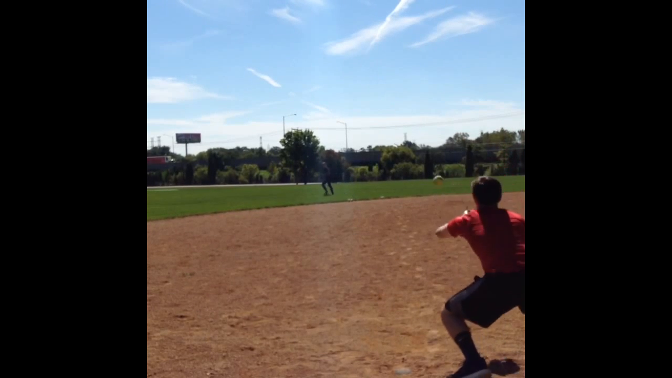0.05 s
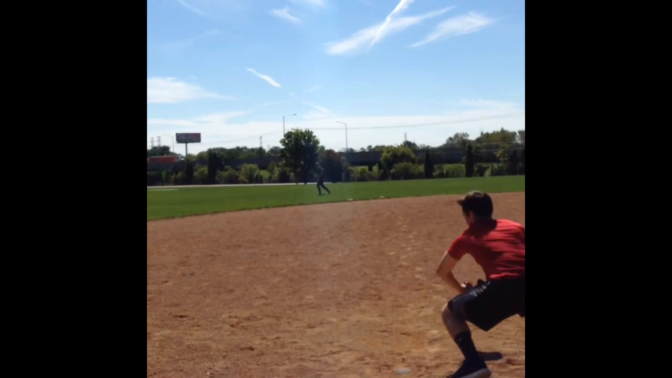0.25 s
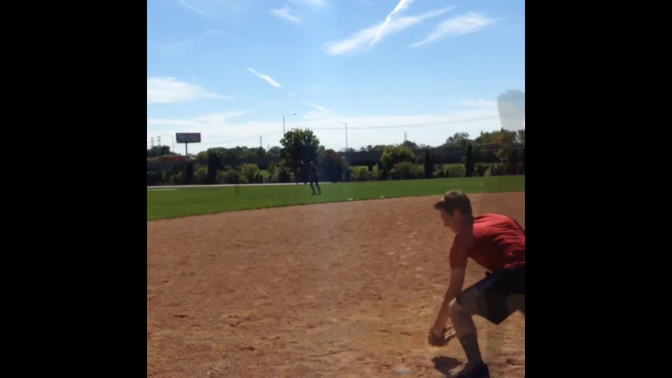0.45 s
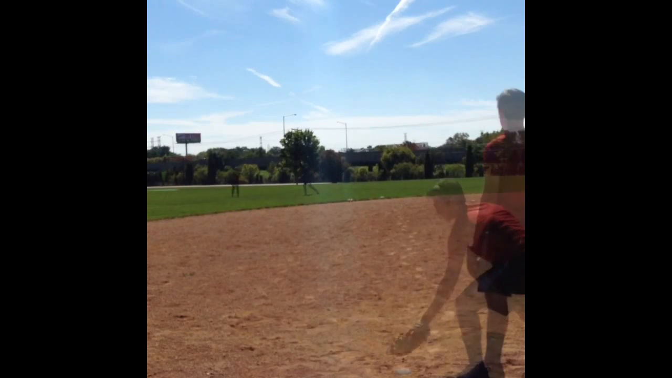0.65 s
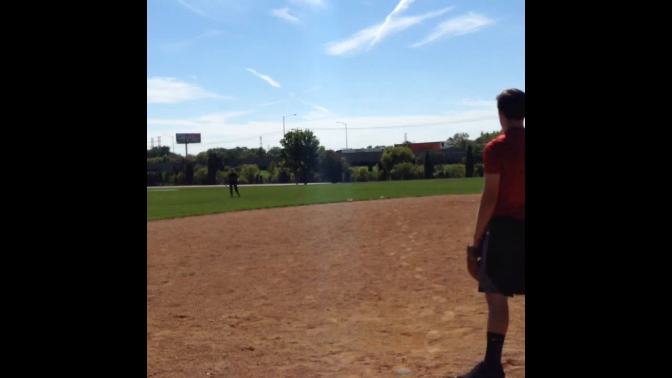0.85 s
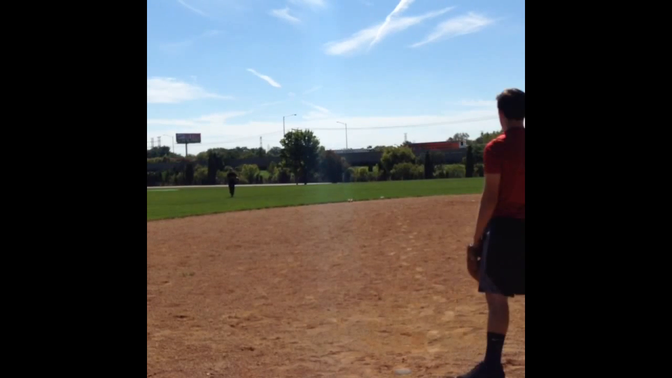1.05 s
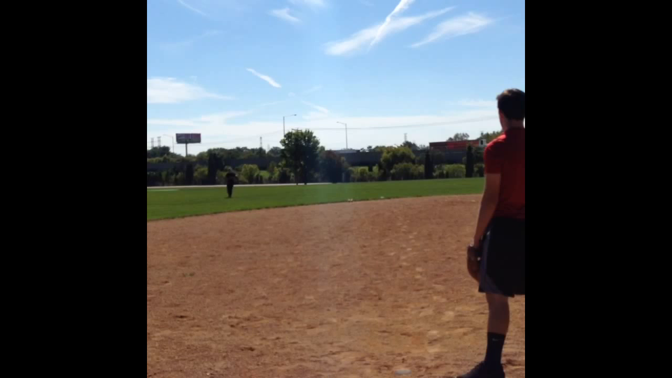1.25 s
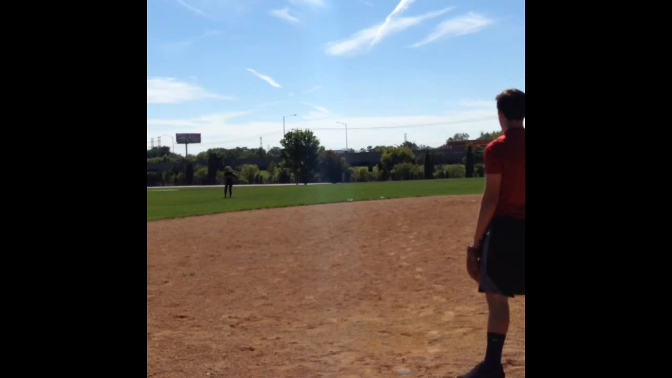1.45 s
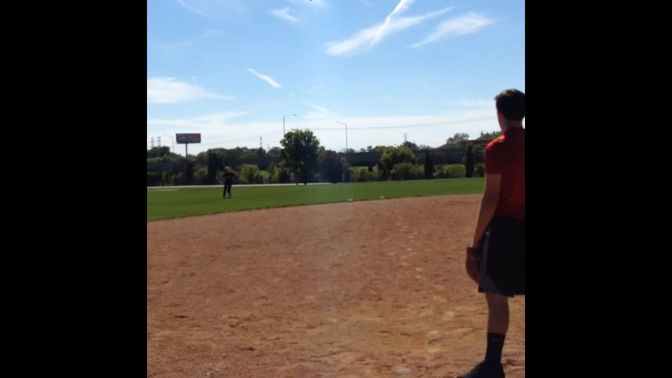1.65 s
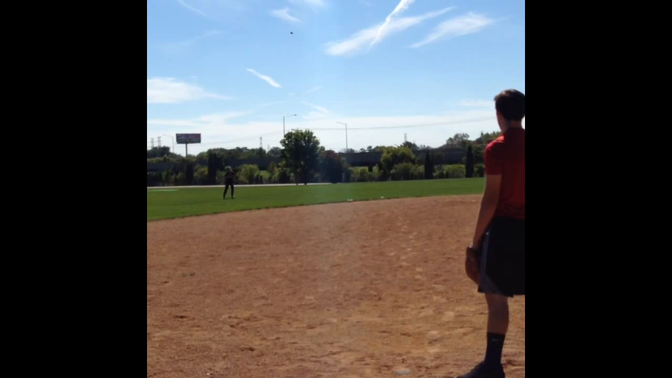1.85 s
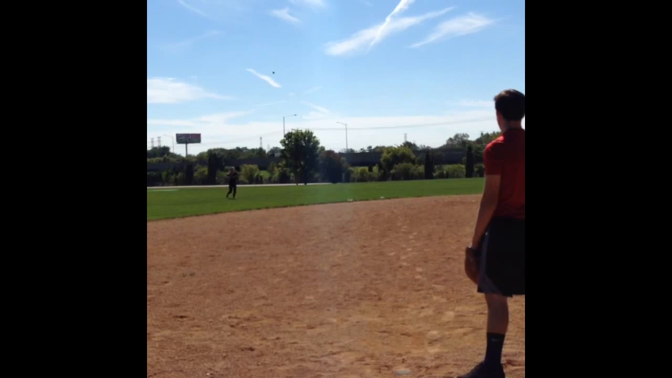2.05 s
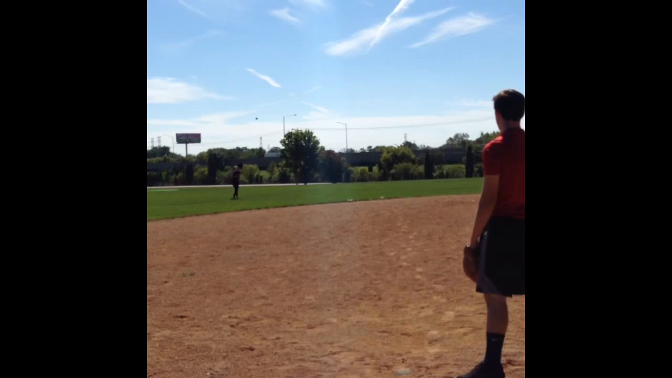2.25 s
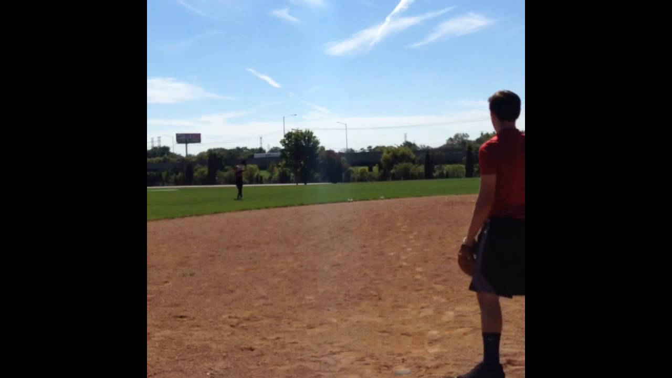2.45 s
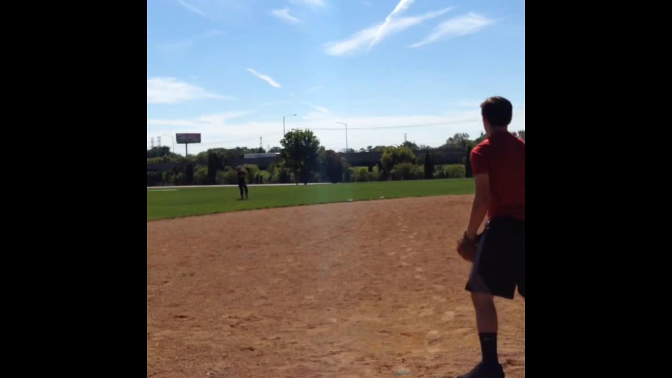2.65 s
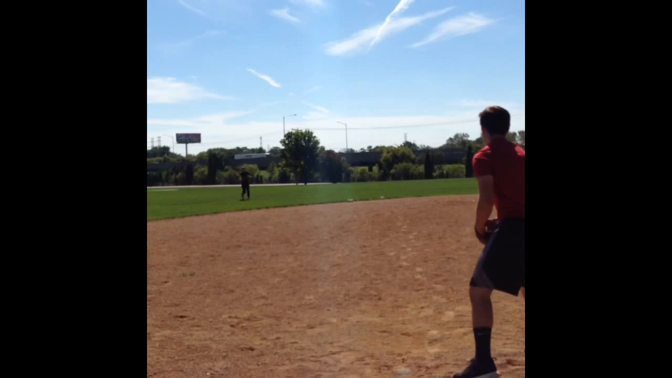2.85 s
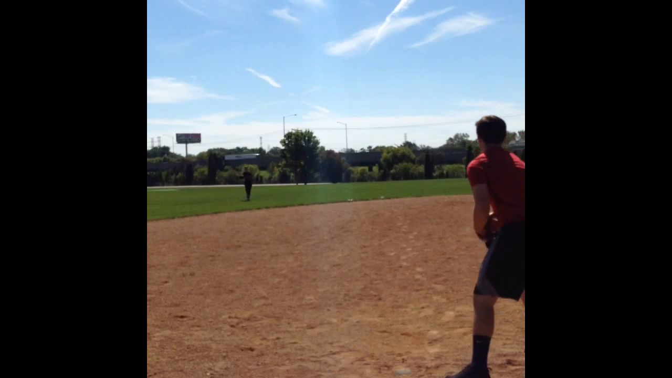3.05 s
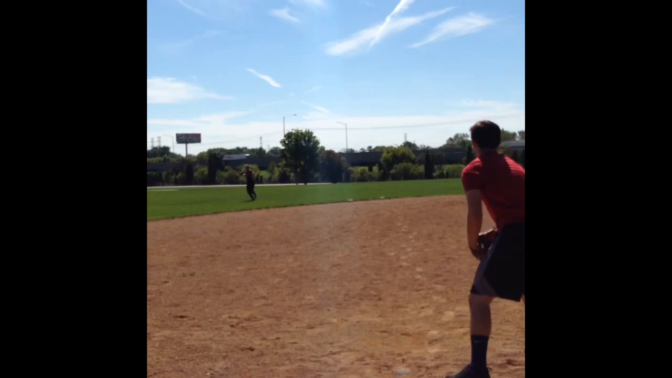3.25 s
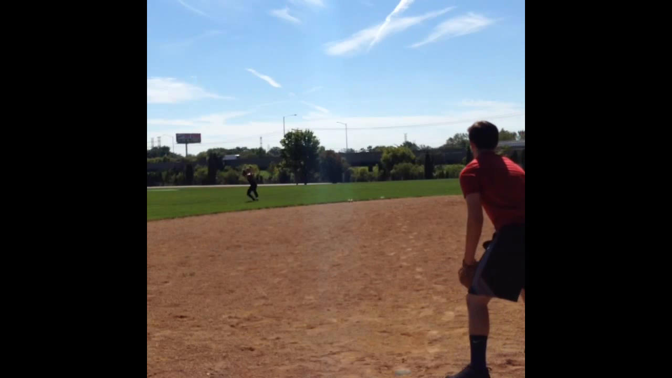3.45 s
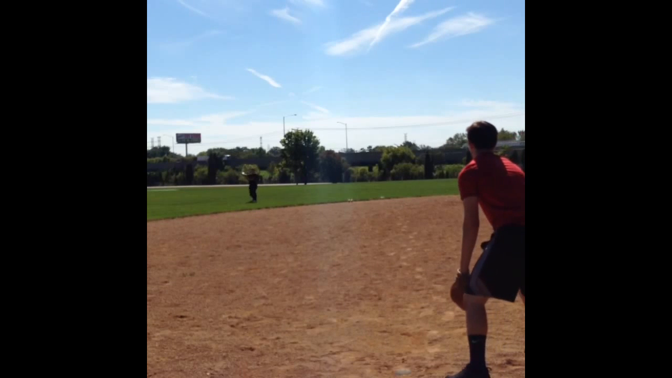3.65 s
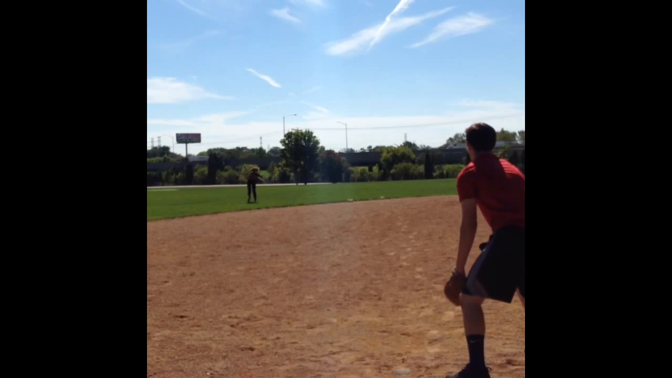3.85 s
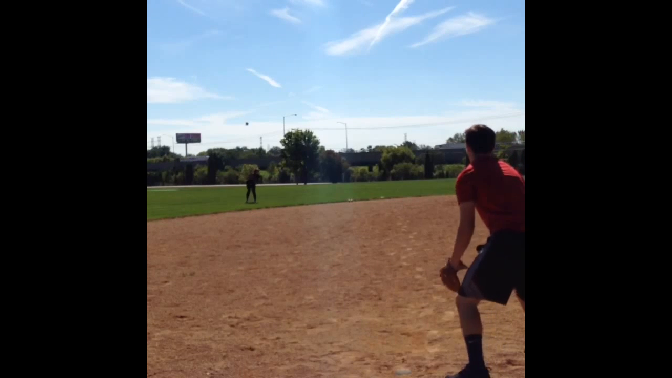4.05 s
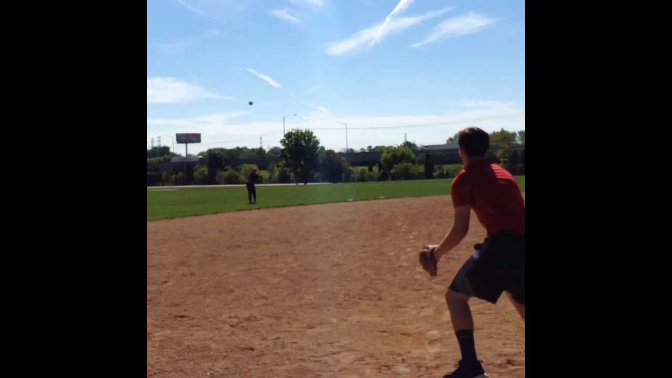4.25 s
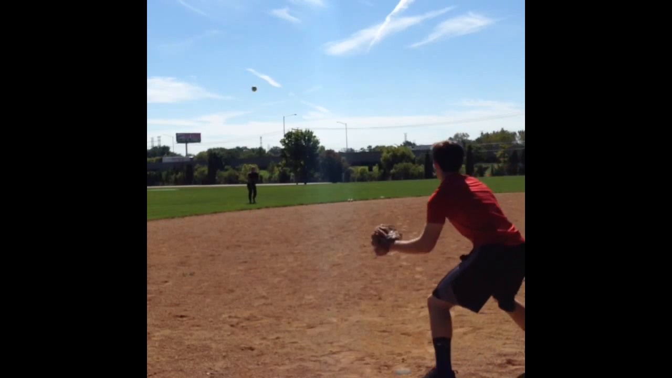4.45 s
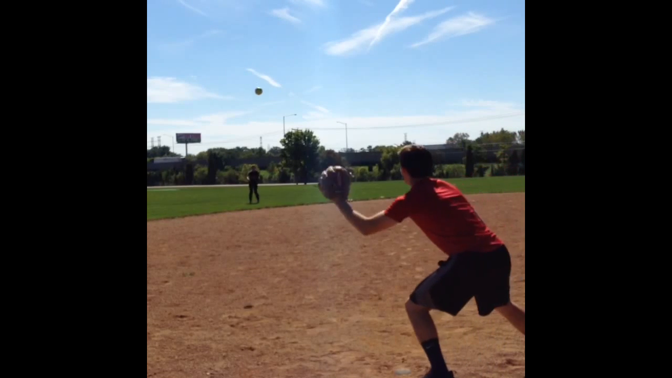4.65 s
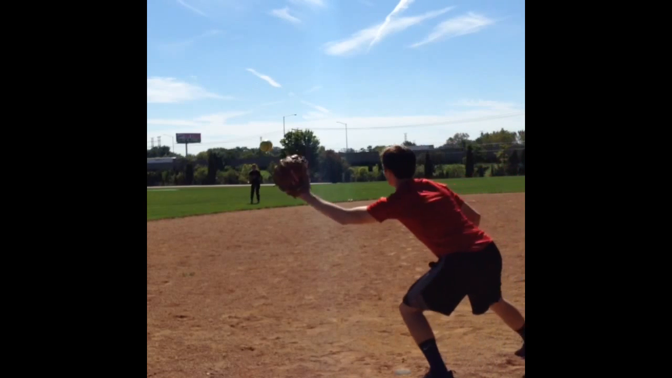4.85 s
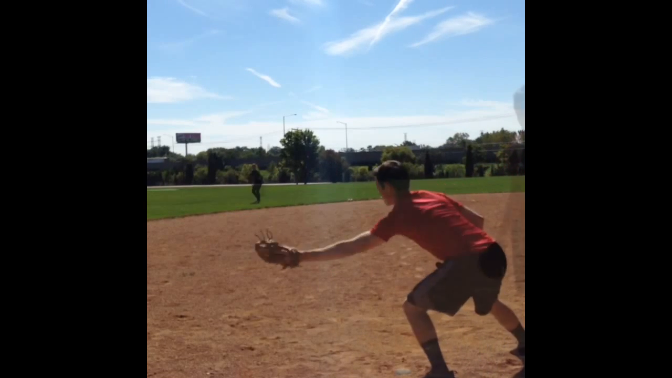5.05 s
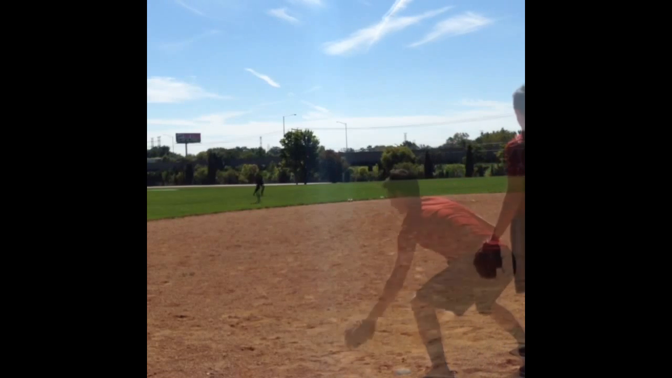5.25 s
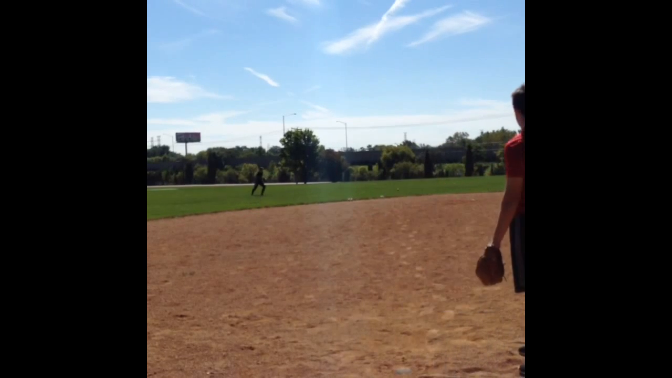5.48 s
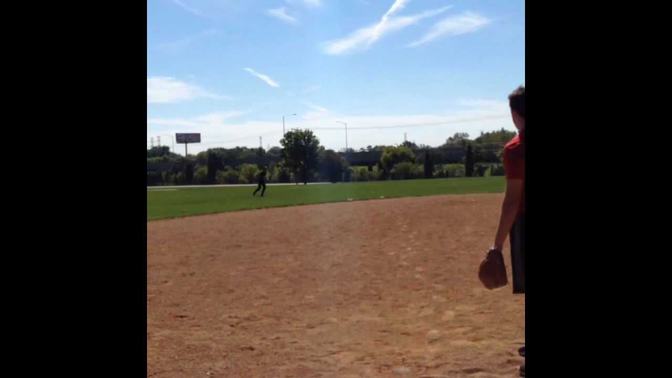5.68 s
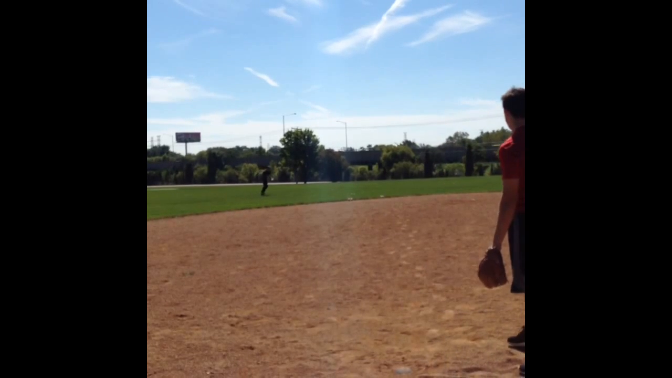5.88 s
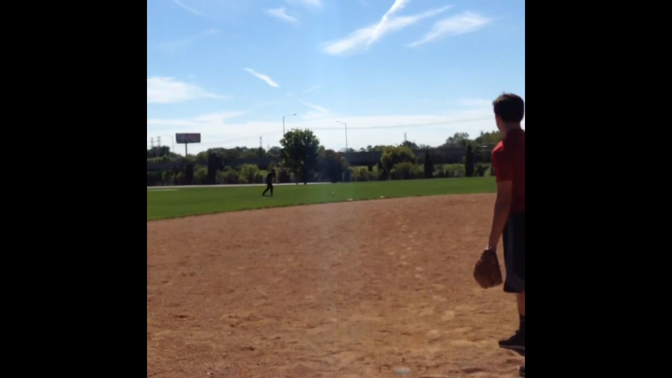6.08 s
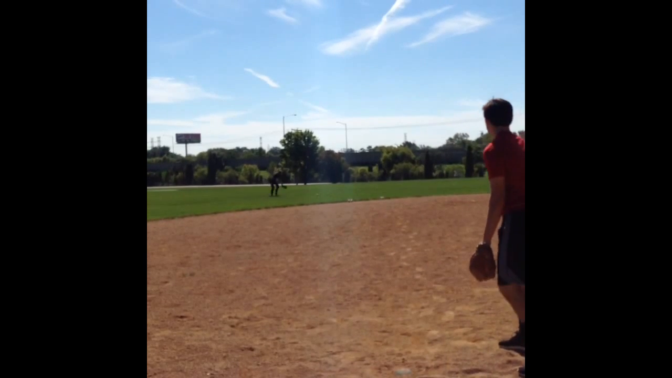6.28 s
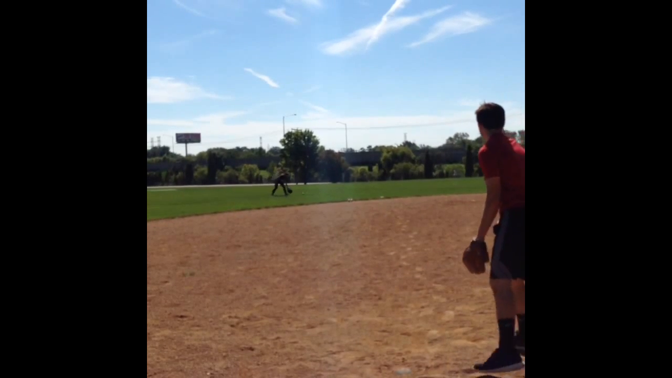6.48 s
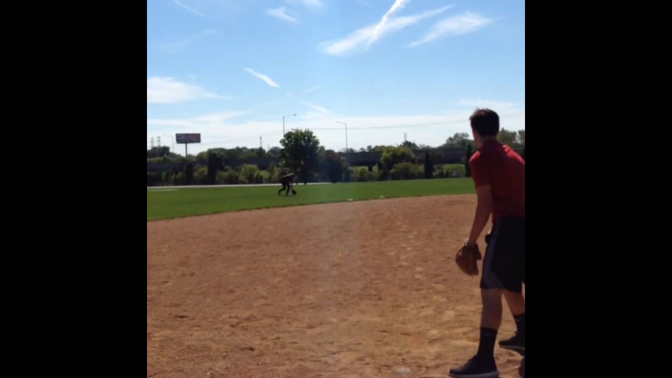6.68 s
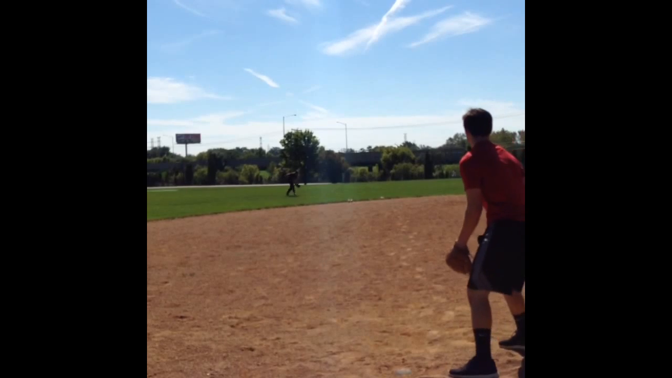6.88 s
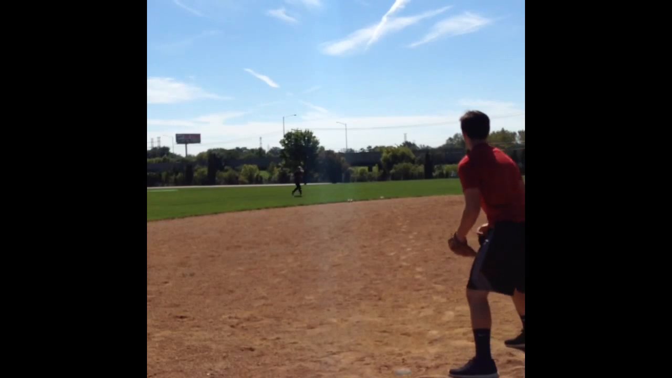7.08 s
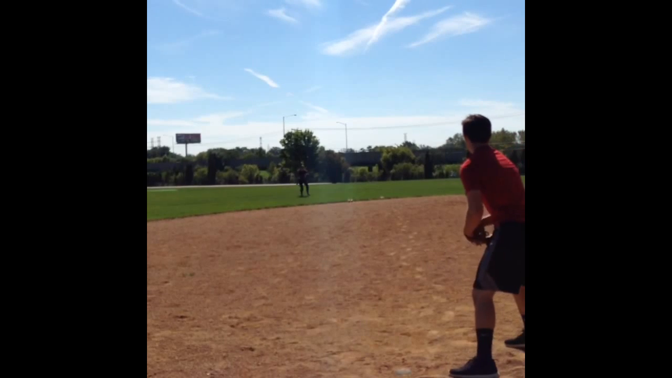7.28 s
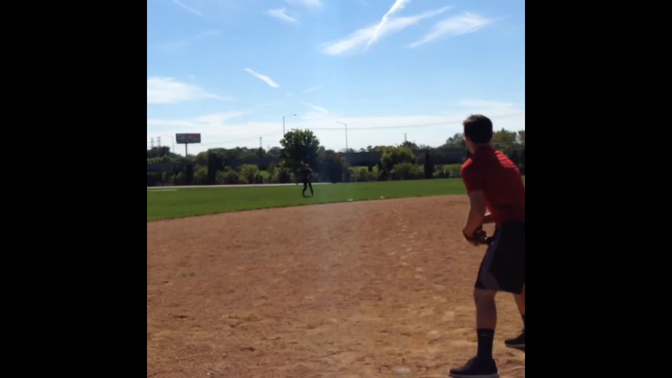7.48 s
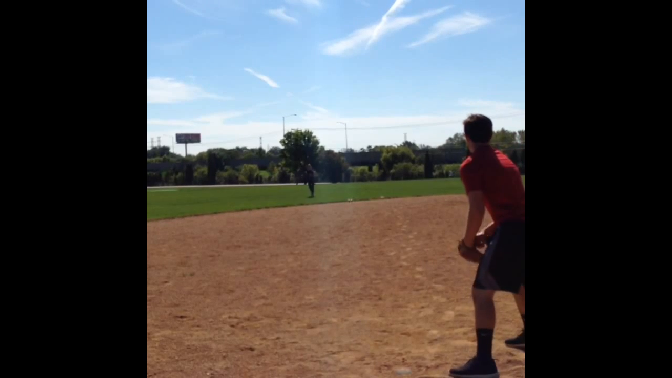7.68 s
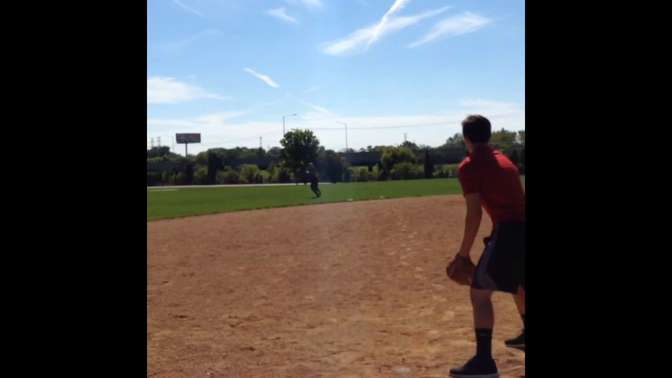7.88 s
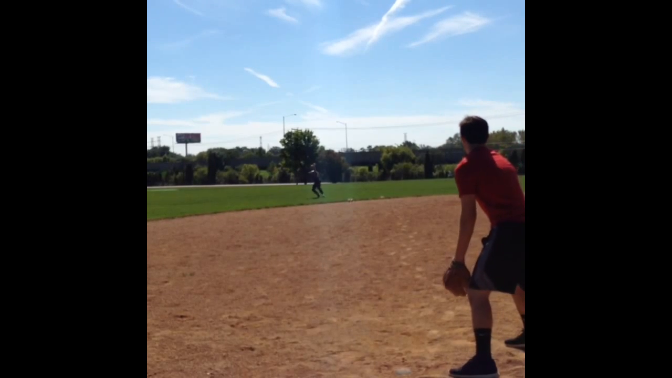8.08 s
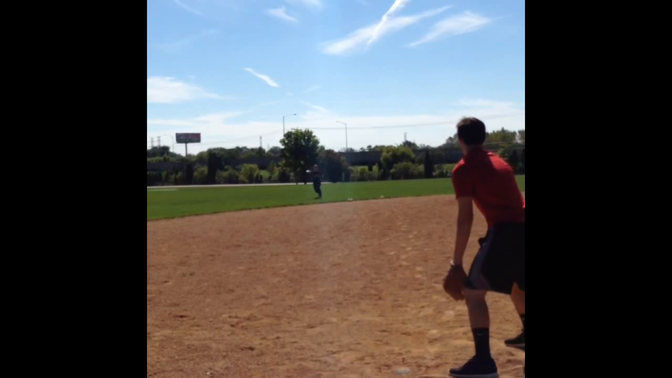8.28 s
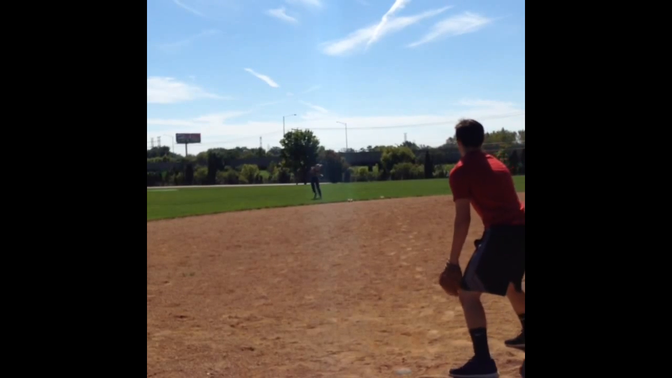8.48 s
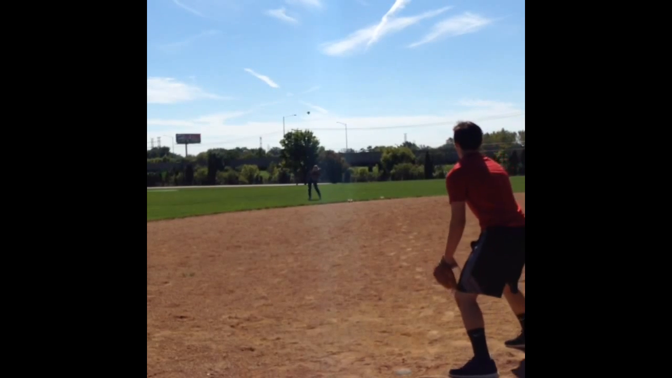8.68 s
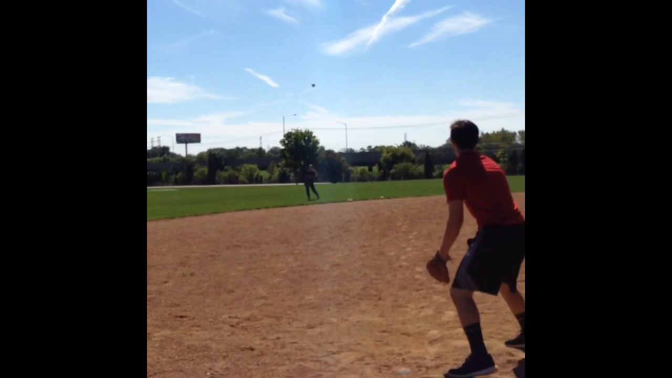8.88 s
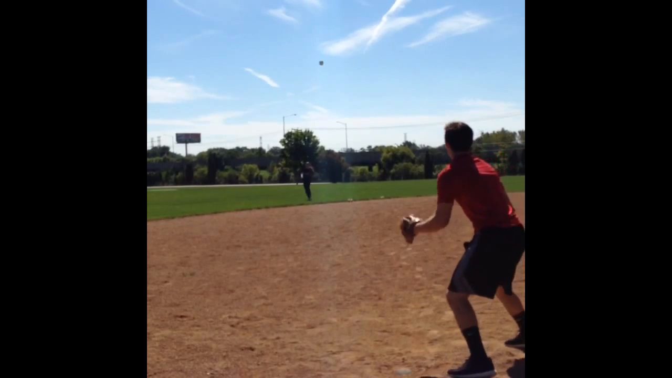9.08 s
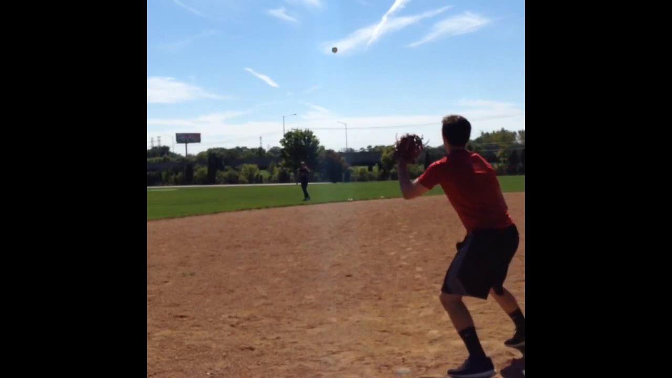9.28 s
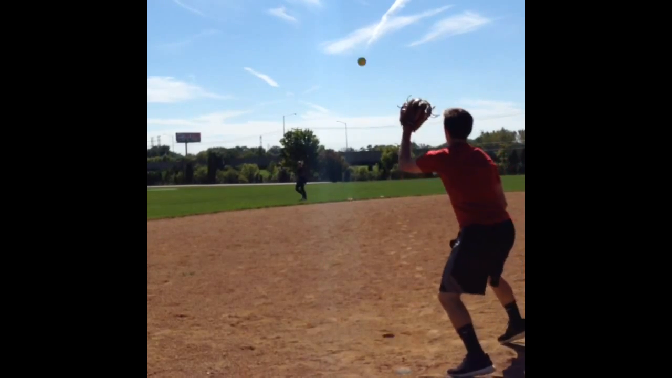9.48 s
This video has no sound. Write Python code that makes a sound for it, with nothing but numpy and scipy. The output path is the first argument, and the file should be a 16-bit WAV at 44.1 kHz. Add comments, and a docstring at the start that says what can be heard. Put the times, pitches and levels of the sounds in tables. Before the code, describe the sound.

Steady highway rumble and faint insect hiss lie behind a game of catch outdoors. Two short leather glove pops sound near the microphone while a passing truck hums and its metal clatter builds. After a light gritty scuff, a third catch cracks loudest and the rattling stops. The rest is quieter: soft footfalls, a fast, thin bird trill and another bird buzzing very faintly far away.

```python
"""A ball pops into a leather glove close by and feet scuff the grit: long toss on an open dirt field.
Pops and faint leather or lace ticks ring the glove's modes, scrunch and echo off the ground.
A truck drones past, bumps rattling its loose metal; behind it a highway rumbles and roars in noise bands.
A small bird trills in fast, high sine sweeps, another buzzes faintly far away, insects hiss in grass."""
import sys
import numpy as np
from scipy import signal
from scipy.io import wavfile

SR = 44100
rng = np.random.default_rng(int(sys.argv[2]) if len(sys.argv) > 2 else 0)


def to_wav(sig):
    """Store sig (one row per channel, or 1-D mono) as 16-bit WAV at the path in sys.argv[1].

    Samples outside -1..1 are clipped; the rate is SR.
    """
    pcm = np.clip(np.atleast_2d(sig), -1, 1) * 32767
    pcm = np.round(pcm).astype(np.int16)
    wavfile.write(sys.argv[1], SR, pcm.T)  # frames by channels


N = 420273

# Ball pops, and faint leather or lace ticks just after.
# Each row: start in seconds, level in dB, tilt in dB per octave, palm slap in dB, pitch ratio,
# scrunch level in dB, scrunch length in seconds, scrunch fade in dB.
GLOVE_SOUNDS = [(.1866, -19, -.5, -5, .85, -29, .0125, -9), (2.6403, -11.5, -5, -6, .9, -41, .005, -10),
                (.2385, -44, 0, 0, 1, -54, .004, -6), (5.04690, -1, 0, -1, 1, -31.5, .055, -21),
                (5.0568, -42, 5, 0, 1, -52, .004, -6)]
# Each row: frequency in Hz, relative level in dB, T60 in seconds.
GLOVE_MODES = [(380, -29, .012), (560, -11, .008), (760, -13, .004), (1050, -13, .005), (1400, -22, .006),
               (2100, -29, .003), (3150, -3, .002), (3750, -9, .002), (5100, -11.5, .0018),
               (7400, -11, .0015), (8600, -14, .0013), (10500, -19, .0012), (12800, -22, .001)]
# Each row: frequency in Hz, relative density in dB.
LEATHER_SPECTRUM = [(180, -29), (330, -3), (700, -6.5), (1900, -4), (2900, -15), (3700, -11), (5200, -19),
                    (7110, -17), (15400, -33)]
POCKET_TOP_HZ, SLAP_BAND_HZ, GLOVE_LOW_HZ = 1800, (2000, 4500), 280
GROUND_ECHO_S, GROUND_ECHO_DB, GROUND_CUT_HZ = .00194, -6, 6000
# Low thuds of the ball in the glove and of footsteps.
# Each row: start in seconds, peak in dB, frequency in Hz, T60 in seconds.
THUDS = [(.189, -32, 355, .045), (9.0, -37, 250, .04), (5.86, -27, 82, .07), (5.862, -30, 225, .04),
         (6.6, -35, 223, .04), (1.6, -34, 202, .06)]

# Each row: peak time in seconds, level in dB.
SHOE_DRAGS = [(4.39, -72), (4.49, -68), (4.515, -65), (4.565, -62), (4.6, -67), (4.64, -70), (5.03, -66)]
# Each row: start in seconds, peak in dB, frequency in Hz.
PEBBLE_TICKS = [(0.8834, -67, 8100), (3.0294, -62, 12500), (4.556, -41, 13200), (4.5604, -35, 9530),
                (4.5714, -46, 10500), (4.5784, -43, 11000), (4.6244, -50, 12000), (4.6428, -45, 11500)]

# Truck hitting bumps. Each row: peak time in seconds, rattle level in dB, high-mode boost in dB.
JOLTS = [(.52, -59.5, 0), (.8, -60, 0), (1.08, -53, 3), (1.32, -52, 2), (1.94, -58, 0), (2.16, -57.5, 0),
         (2.55, -55, 0), (2.89, -50, 2), (3.12, -52, -2), (3.25, -50, 0), (3.31, -48, 0), (3.64, -60, 0),
         (3.8, -58, 0), (3.92, -57, 0), (4.155, -45.5, 2.5), (4.26, -47.5, 1), (4.4, -46.5, 1),
         (4.57, -47, 1), (4.76, -46.5, 0), (5.0, -47, 0)]
# Loudest metal knocks. Each row: start in seconds, strength in dB.
CLANKS = [(1.103, -44), (1.38, -45), (2.88, -45), (3.11, -45), (3.255, -44), (3.29, -42), (3.325, -43),
          (4.0906, -33), (4.1295, -34), (4.145, -36), (4.17, -36), (4.19, -37), (4.212, -37), (4.2547, -34),
          (4.331, -38), (4.3745, -35), (4.4139, -36), (4.5341, -39), (4.576, -33), (4.606, -38),
          (4.62, -38), (4.698, -37), (4.74, -37), (4.7535, -34), (4.768, -32), (4.9337, -37), (4.9853, -33)]
# Each row: frequency in Hz, relative level in dB, T60 in seconds.
METAL_MODES = [(2600, -4.5, 0.0095), (3430, -4, 0.016), (3720, -5, 0.016), (4300, -4.5, 0.0078),
               (4910, -5.5, 0.0067), (5630, -9, 0.007), (6670, -6.5, 0.0026), (8100, -7.5, .003)]
MODE_SPLIT_RATIOS, HIGH_MODES_HZ = (.98, 1.03), 4000
RATTLE_IDLE_DB, RATTLE_END_S, RATTLE_BAND_HZ = -63.5, 5.09, (2200, 7370)
CLICKS_PER_S, KNOCKS_PER_S, KNOCK_OVER_RATTLE_DB = 5000, 10, -1
# Each row: start in seconds, length in seconds, pitch in Hz, rms level in dB.
ENGINE_TONES = [(0, .63, 122, -44.5), (2.0, .9, 121, -43), (2.85, 1.1, 122, -41), (3.95, .35, 122, -43),
                (5.3, .35, 120, -42), (6.0, 0.97, 119, -44.5), (8.5, 1.23, 120, -42), (1, 4.3, 74.5, -44.5),
                (3.9, 1.25, 178, -44), (3.9, 1.25, 197, -45), (3.9, 1.45, 223, -50),
                (2.75, .65, 313, -45.5), (2.75, .45, 288, -48), (3.6, .8, 311, -47.5),
                (4.2, .65, 463, -46.5), (3.7, 1.5, 467, -53), (1.4, 2, 468, -57), (6.2, .9, 390, -56),
                (2.7, .8, 150, -45), (5.1, .65, 463, -55), (0, 1.2, 495, -56), (0.6, .8, 320, -53)]

# Each row: time in seconds, rumble in dB, engine band in dB, tyre roar in dB.
HIGHWAY_LEVELS = [(0.0, -35, -40.5, -45), (0.7, -41, -43.5, -47.5), (1.2, -37, -40.5, -44),
                  (1.7, -40.5, -41, -46.5), (2.5, -38, -42.5, -42.5), (2.95, -39, -33, -44),
                  (3.35, -40.5, -40.5, -44), (3.6, -38, -43, -41), (3.9, -40, -38.5, -45),
                  (4.5, -37.5, -41, -42.5), (5.0, -38.5, -37.5, -45), (5.2, -39.5, -45, -50.5),
                  (5.7, -41.5, -43, -46), (6.2, -37, -43, -46), (7.1, -37.5, -43.5, -44.5),
                  (7.5, -39.5, -45.5, -47), (8.3, -38, -45, -45.5), (9.0, -38.5, -43.5, -46.5),
                  (9.53, -35.5, -43.5, -47)]
# Highway treble. Each row: time in seconds, level in dB.
HIGHWAY_HISS = [(0, -62.5), (2.6, -62), (4.5, -60.5), (5.1, -61), (5.3, -64.5), (6.2, -62.5), (7.1, -66),
                (9.53, -65.5)]
# Each row: frequency in Hz, relative density in dB.
TRAFFIC_SPECTRUM = [(12, -42), (20, -30.5), (60, -1), (113, -1.5), (173, -5.5), (285, -14), (636, -16.5),
                    (1080, -16.5), (1780, -20.5), (3160, -36.5), (5220, -41), (7060, -54), (8000, -42),
                    (10400, -79), (17600, -120)]
ROAR_HZ, ROAR_HZ_PER_DB, ROAR_REF_DB = 1114, 28, -44.5  # nearer tyres roar louder and higher
HUMP_WIDTH_HZ, HUMP_DB = 476, -3.5

# One trill note. Each row: time in seconds, pitch in Hz, relative level in dB.
NOTE_SHAPE = [(0, 8440, -12), (.004, 8900, 3), (.008, 8690, -1), (.013, 8200, -1.5), (0.018, 7400, -25)]
# One list per trill, notes evenly spaced between rows. Each row: time in seconds, level in dB.
TRILLS = [
    [(0.4723, -77), (0.7876, -74)],
    [(5.1372, -70), (5.3622, -62.5), (5.5293, -58.5), (6.3076, -59), (8.1624, -58), (8.9935, -59),
     (9.4789, -59)],
]
# One pitch ratio per trill.
TRILL_PITCH_RATIOS = [.955, 1]
NOTE_PERIOD_S = .0547
# Far bird's held buzzes. Each row: start in seconds, length in seconds, level in dB.
BUZZES = [(5.5, .35, -75), (5.88, .64, -77), (6.8, .6, -82), (7.7, .47, -77), (8.52, .48, -76),
          (9.17, .5, -78)]
# Each row: frequency in Hz, relative level in dB.
BUZZ_PARTIALS = [(5810, -6), (5280, -5), (5130, 0)]
# Far bird's falling phrases. Each row: time in seconds, level in dB.
PHRASES = [(5.73, -71), (6.55, -76), (7.37, -80), (8.19, -72), (9.02, -74)]
# Each row: offset in seconds, length in seconds, pitch in Hz, relative level in dB.
PHRASE_NOTES = [(-.045, .08, 4730, -2), (-.025, 0.13, 4380, 0), (.015, .12, 4190, -1)]

# Each row: time in seconds, level in dB.
INSECT_LEVELS = [(0, -64), (.6, -65.5), (2.6, -73), (5.0, -62.5), (5.2, -81), (9.53, -69.5)]
INSECT_HZ, INSECT_WIDTH_HZ = 5340, 1070
MIC_HISS_DB, CUTOFF_HZ = -77, 15280


def glove():
    """Each pop or tick rings the glove's modes and scrunches leather; the dirt returns a dull echo."""
    out = np.zeros(N)
    for start_s, hit_db, tilt_db, slap_db, pitch_ratio, scrunch_db, scrunch_s, fade_db in GLOVE_SOUNDS:
        for hz, mode_db, t60_s in GLOVE_MODES:
            in_slap_band = SLAP_BAND_HZ[0] < hz < SLAP_BAND_HZ[1]
            level_db = hit_db + mode_db + tilt_db * np.log2(hz / 560) + slap_db * in_slap_band
            polarity = np.sign(POCKET_TOP_HZ - hz)  # low modes push air out, high ones snap inward
            add(out, start_s, polarity * from_db(level_db) * soft_ring(hz * pitch_ratio, t60_s))
        size = round(scrunch_s * SR)
        spectrum = [(hz, db + tilt_db / 2 * np.log2(hz / 560)) for hz, db in LEATHER_SPECTRUM]
        leather = noise_bands(spectrum, 295, 12400, flicker_db=2.0, size=size + 2000)[2000:]
        add(out, start_s, leather * from_db(np.linspace(scrunch_db, scrunch_db + fade_db, size)))
    echo = butterworth(out, 1, GROUND_CUT_HZ, "low")
    add(out, GROUND_ECHO_S, from_db(GROUND_ECHO_DB) * echo)
    return butterworth(out, 2, GLOVE_LOW_HZ, "high")  # too small to radiate bass


def thuds():
    """Ball in glove and footsteps: one low, padded mode each."""
    out = np.zeros(N)
    for start_s, peak_db, hz, t60_s in THUDS:
        add(out, start_s, from_db(peak_db) * soft_ring(hz, t60_s))
    return out


def scuffs():
    """Grit hisses under a dragging shoe, pebbles tick."""
    grains = rng.standard_normal(N) * from_db(3 * np.minimum(rng.exponential(1, N), 5))
    grit = rms_one(butterworth(grains, 2, 7000, "high"))
    out = grit * swells(SHOE_DRAGS, rise_db_per_s=600, hold_s=.01, fall_db_per_s=350)
    for start_s, peak_db, hz in PEBBLE_TICKS:
        add(out, start_s, from_db(peak_db) * ring(signal.unit_impulse(400), hz, t60_s=.0007))
    return out


def truck_rattle():
    """Dense uneven clicks and louder knocks ring loose metal; distance dulls the top."""
    low_jolts = [(s, db) for s, db, _ in JOLTS]
    high_jolts = [(s, db + boost_db) for s, db, boost_db in JOLTS]
    jolt_gains = [swells(rows, rise_db_per_s=150, hold_s=.047, fall_db_per_s=170)
                  for rows in (low_jolts, high_jolts)]
    gains = np.hypot(jolt_gains, from_db(RATTLE_IDLE_DB))
    gate = np.clip((RATTLE_END_S - np.arange(N) / SR) / .011, 0, 1)
    click_db = 3.3 * np.minimum(rng.exponential(1, N), 5) + 2.5 * drift(40)
    clicks = from_db(click_db) * rng.choice([-1, 1], N)
    clicks *= rng.random(N) < CLICKS_PER_S / SR
    knock_samples = np.flatnonzero(gate * (rng.random(N) < KNOCKS_PER_S / SR))
    lesser_knocks = [(i / SR, 20 * np.log10(gains[0, i]) + KNOCK_OVER_RATTLE_DB) for i in knock_samples]
    blows = np.zeros(N)
    for start_s, strength_db in CLANKS + lesser_knocks:  # each a quick clatter of contacts
        add(blows, start_s, from_db(strength_db - 16) * rng.standard_normal(200) * np.hanning(200))
    struck_mode = rng.integers(0, len(METAL_MODES), N)
    chatter, knocks = np.zeros((2, N)), np.zeros(N)
    for k, (hz, mode_db, t60_s) in enumerate(METAL_MODES):
        pair = sum(ring(clicks * (struck_mode == (k + j) % len(METAL_MODES)), hz * ratio, t60_s)
                   for j, ratio in enumerate(MODE_SPLIT_RATIOS))
        chatter[int(hz > HIGH_MODES_HZ)] += from_db(mode_db) * pair
        knock_db = 3 * mode_db + (6 if k in (1, 2) else 1)  # knocks favour the strongest modes
        knocks += from_db(knock_db) * ring(blows, hz, t60_s)
    rattle = gate * np.sum(gains * rms_one(chatter), axis=0) * np.sqrt(.5)
    return butterworth(rattle + knocks, 3, RATTLE_BAND_HZ, "band")


def engines():
    """Engines drone in overlapping, slowly wavering tones."""
    return swelling_tones(ENGINE_TONES, flicker_db=2.5, drift_hz=5)


def tyre_roar(level_db):
    """Noise with a resonant hump that moves as vehicles pass."""
    roar = noise_bands(TRAFFIC_SPECTRUM, 626, 2767, flicker_db=.65)
    hump_hz = ROAR_HZ + ROAR_HZ_PER_DB * (level_db - ROAR_REF_DB)
    radius = np.exp(-np.pi * HUMP_WIDTH_HZ / SR)
    zeros = np.array([1, 0, -1]) * (1 - radius ** 2) / 2
    hump, state = np.zeros(N), np.zeros(2)
    for i in range(0, N, 512):
        poles = [1, -2 * radius * np.cos(2 * np.pi * hump_hz[i] / SR), radius ** 2]
        hump[i:i + 512], state = signal.lfilter(zeros, poles, roar[i:i + 512], zi=state)
    return from_db(level_db) * (roar + from_db(HUMP_DB) * hump)


def highway():
    """Traffic noise: tyre roar, rumble, engine band, far hiss."""
    rumble_db, engine_db, roar_db = per_sample(HIGHWAY_LEVELS)
    hiss_db, = per_sample(HIGHWAY_HISS)
    return (tyre_roar(roar_db)
            + from_db(rumble_db) * noise_bands(TRAFFIC_SPECTRUM, 22.2, 140.3, flicker_db=.5)
            + from_db(engine_db) * noise_bands(TRAFFIC_SPECTRUM, 142.8, 586, flicker_db=2.0)
            + from_db(hiss_db) * noise_bands(TRAFFIC_SPECTRUM, 2780, 9980, flicker_db=.9))


def trilling_bird():
    """One hooked, falling note repeated, slightly different each time."""
    out = np.zeros(N)
    shape_s, shape_hz, shape_db = np.transpose(NOTE_SHAPE)
    top_hz = shape_hz[1]
    for marks, pitch_ratio in zip(TRILLS, TRILL_PITCH_RATIOS):
        mark_s, mark_db = np.transpose(marks)
        mark_index = np.cumsum(np.round(np.diff(mark_s, prepend=mark_s[0]) / NOTE_PERIOD_S))
        jitter = rng.normal(0, 1, (int(mark_index[-1]) + 1, 4))
        for k, (sharp, stretch, late, loud) in enumerate(jitter):
            t = np.arange(round(shape_s[-1] * SR)) / SR / (1 + .1 * stretch)
            sweep_hz = top_hz + (np.interp(t, shape_s, shape_hz) - top_hz) * (1 + .25 * stretch)
            level_db = np.interp(t, shape_s, shape_db) + np.interp(k, mark_index, mark_db) + 1.6 * loud
            note = tone(sweep_hz * (pitch_ratio + .006 * sharp), level_db)
            start_s = np.interp(k, mark_index, mark_s) - .002 + .0008 * late
            add(out, start_s, note * signal.windows.tukey(len(t), .2))
    return out


def far_bird():
    """Falling notes and held buzzes, roughened by fast flicker."""
    notes = [(s + offset_s, length_s, hz, db + note_db)
             for s, db in PHRASES for offset_s, length_s, hz, note_db in PHRASE_NOTES]
    buzzes = [(s, length_s, hz, db + partial_db)
              for s, length_s, db in BUZZES for hz, partial_db in BUZZ_PARTIALS]
    return swelling_tones(notes + buzzes, flicker_db=3.5, drift_hz=35)


def among_trees(call, echo_db, t60_s=.3):
    """Leaves and trunks add a short diffuse tail."""
    t = np.arange(SR // 4) / SR
    tail = rng.standard_normal(len(t)) * from_db(-60 * t / t60_s)
    return call + from_db(echo_db) * signal.fftconvolve(call, tail / np.linalg.norm(tail))[:N]


def insects():
    """Many wings blur into one soft band of hiss."""
    level_db, = per_sample(INSECT_LEVELS)
    edges_hz = [INSECT_HZ - INSECT_WIDTH_HZ / 2, INSECT_HZ + INSECT_WIDTH_HZ / 2]
    hiss = butterworth(rng.standard_normal(N), 2, edges_hz, "band")
    return from_db(level_db + 1.6 * drift(4.3)) * rms_one(hiss)


def ring(clicks, hz, t60_s):
    """A unit click rings a decaying sine of height 1."""
    radius, angle = from_db(-60 / (t60_s * SR)), 2 * np.pi * hz / SR
    poles = [1, -2 * radius * np.cos(angle), radius ** 2]
    return signal.lfilter([0, np.sin(angle)], poles, clicks + 1e-18)


def soft_ring(hz, t60_s):
    """Padded contact: the ring swells, then dies; peak 1."""
    struck = ring(signal.unit_impulse(SR // 10), hz, t60_s)
    padded = ring(struck, hz, t60_s)
    return padded / np.abs(padded).max()


def noise_bands(spectrum, low_hz, high_hz, flicker_db, size=N):
    """Third-octave noise bands, each with its own level and flicker; total rms 1."""
    out, white = 0, rng.standard_normal((2, size))  # neighbouring bands get unrelated noise
    edges_hz = np.geomspace(low_hz, high_hz, round(3 * np.log2(high_hz / low_hz)) + 1)
    hz, level_db = np.transpose(spectrum)
    for k, (low, high) in enumerate(zip(edges_hz, edges_hz[1:])):
        band_db = np.interp(np.log(low * high) / 2, np.log(hz), level_db)
        gain = from_db(band_db + flicker_db * drift(5.6, size))
        out = out + gain * butterworth(white[k % 2], 2, [low, high], "band")
    return rms_one(out)


def swelling_tones(rows, flicker_db, drift_hz, waver=.004):
    """Tones that fade in and out, drifting in pitch and level."""
    out = np.zeros(N)
    for start_s, length_s, pitch_hz, rms_db in rows:
        size = round(length_s * SR)
        hz = pitch_hz * (1 + waver * drift(drift_hz, size))
        level_db = rms_db + flicker_db * drift(drift_hz, size)
        add(out, start_s, np.sqrt(2) * signal.windows.tukey(size, .5) * tone(hz, level_db))
    return out


def tone(hz, level_db):
    """Sine with per-sample pitch and level."""
    return from_db(level_db) * np.sin(np.cumsum(2 * np.pi * hz / SR) + 2 * np.pi * rng.random())


def swells(rows, rise_db_per_s, hold_s, fall_db_per_s):
    """Gain that climbs to each peak, holds and sinks; powers add."""
    t = np.arange(0, N + 40, 40) / SR
    power = 0
    for peak_s, peak_db in rows:
        slope_db_per_s = np.where(t < peak_s, rise_db_per_s, fall_db_per_s)
        outside_hold_s = np.maximum(np.abs(t - peak_s) - hold_s / 2, 0)
        power += from_db(peak_db - slope_db_per_s * outside_hold_s) ** 2
    return np.interp(np.arange(N) / SR, t, np.sqrt(power))


def drift(rate_hz, size=N):
    """Slow noise of rms 1: two low-pass poles, one step per 40 samples."""
    pole = np.exp(-2 * np.pi * rate_hz * 40 / SR)
    white = rng.standard_normal(size // 40 + 2002)
    slow = signal.lfilter([1], [1, -2 * pole, pole ** 2], white)[2000:]
    return np.interp(np.arange(size) / 40, np.arange(len(slow)), rms_one(slow))


def per_sample(rows):
    """A curve table's columns, interpolated per sample."""
    times_s, *columns = np.transpose(rows)
    return [np.interp(np.arange(N) / SR, times_s, column) for column in columns]


def butterworth(x, order, edges_hz, kind):
    return signal.sosfilt(signal.butter(order, edges_hz, kind, fs=SR, output="sos"), x)


def from_db(db):
    return 10 ** (np.asarray(db) / 20)


def rms_one(x):
    return x / np.sqrt(np.mean(x ** 2) + 1e-20)


def add(out, start_s, sound):
    at = min(round(start_s * SR), N)
    out[at:at + len(sound)] += sound[:N - at]


def scene():
    """All sources, mono."""
    drone = engines()
    birds = among_trees(far_bird(), echo_db=-4) + among_trees(trilling_bird(), echo_db=-14)
    traffic = highway() + drone + truck_rattle()
    return (glove() + thuds() + scuffs() + traffic + birds + insects())[None]


def record(dry):
    """Faint microphone hiss, then a steep low-pass."""
    hiss = from_db(MIC_HISS_DB) * rng.standard_normal(dry.shape)
    return signal.sosfilt(signal.ellip(10, .5, 70, CUTOFF_HZ, fs=SR, output="sos"), dry + hiss)


dry = scene()
out = record(dry)
to_wav(out)
```